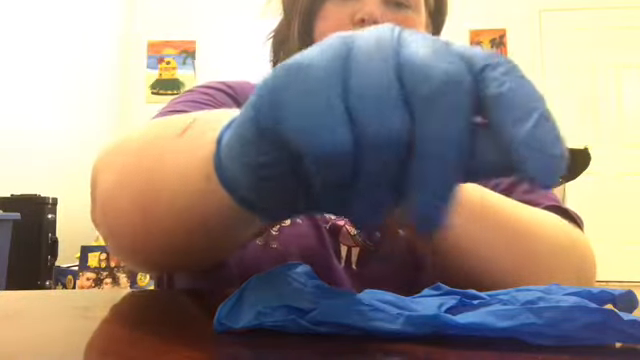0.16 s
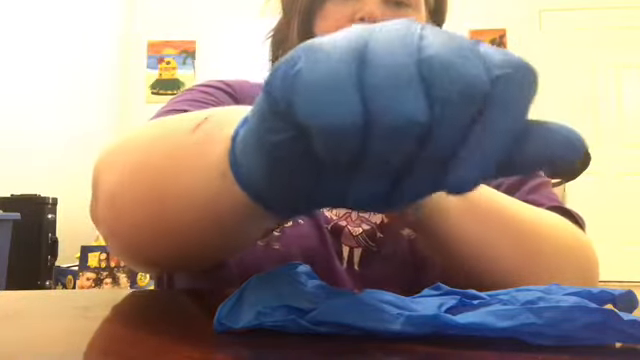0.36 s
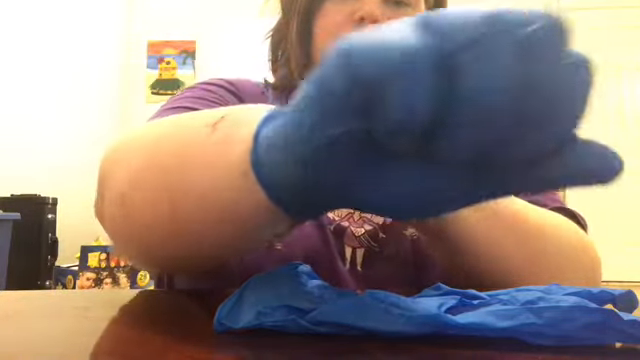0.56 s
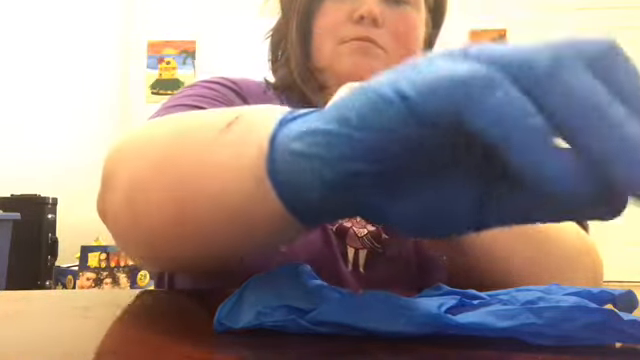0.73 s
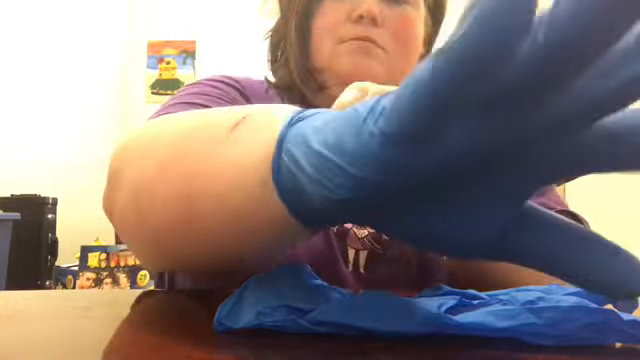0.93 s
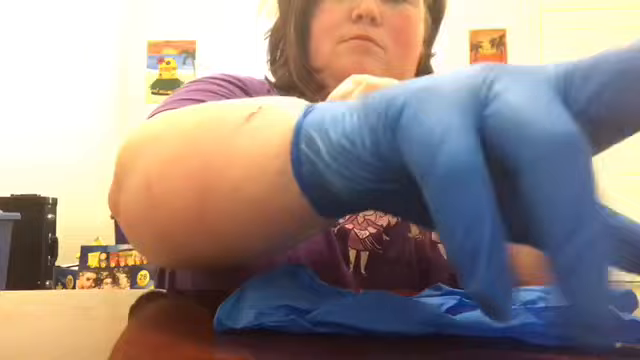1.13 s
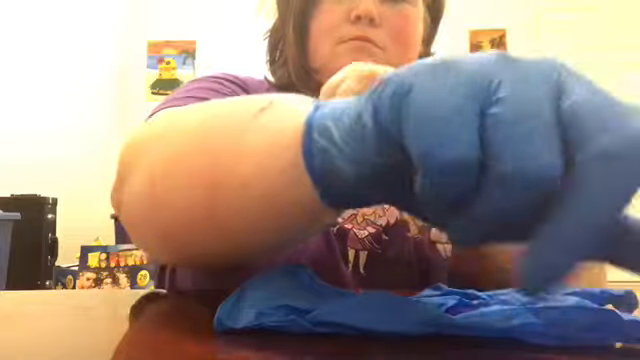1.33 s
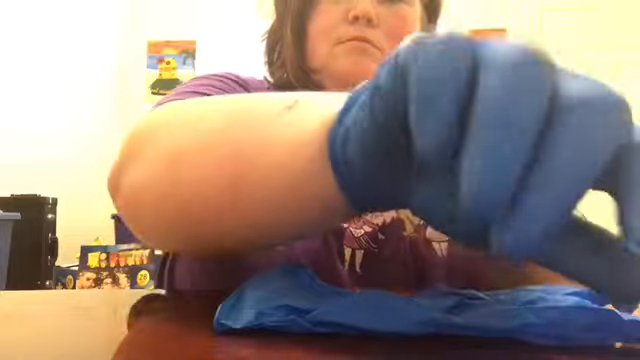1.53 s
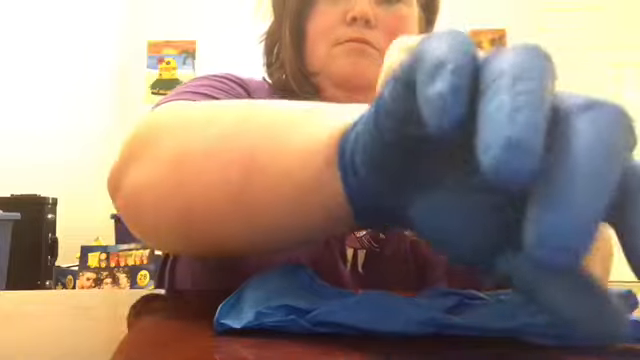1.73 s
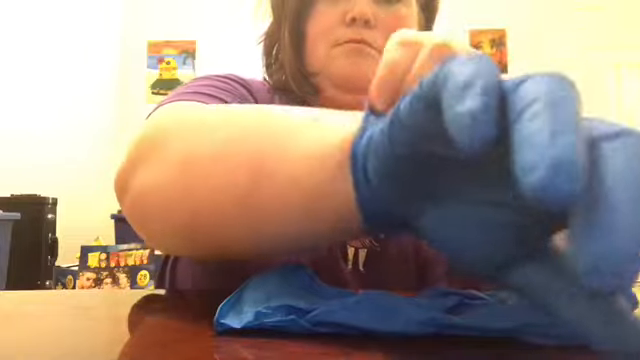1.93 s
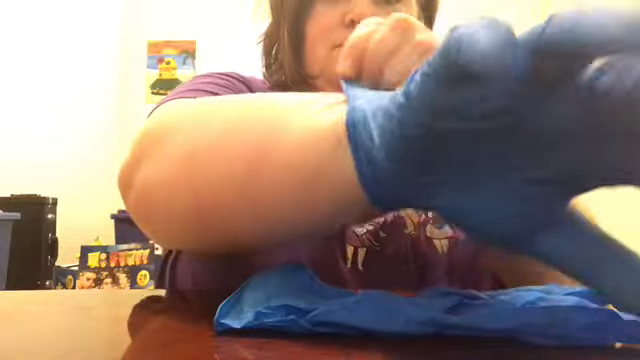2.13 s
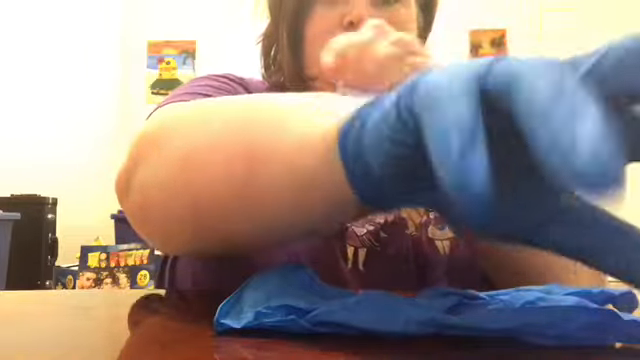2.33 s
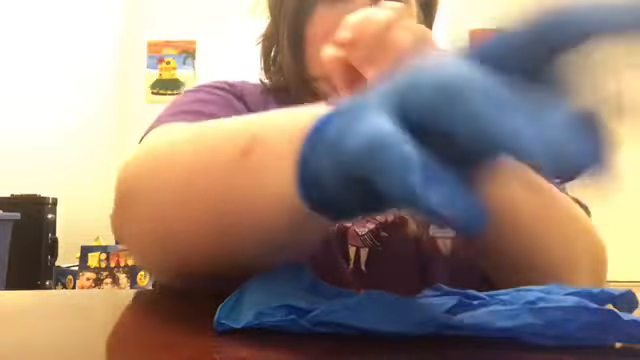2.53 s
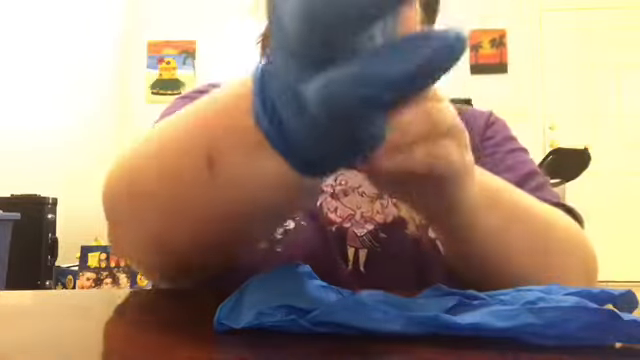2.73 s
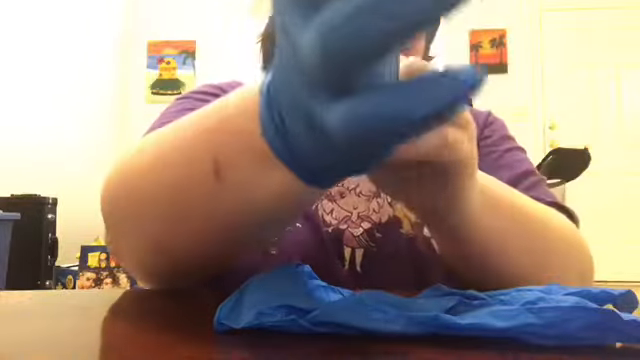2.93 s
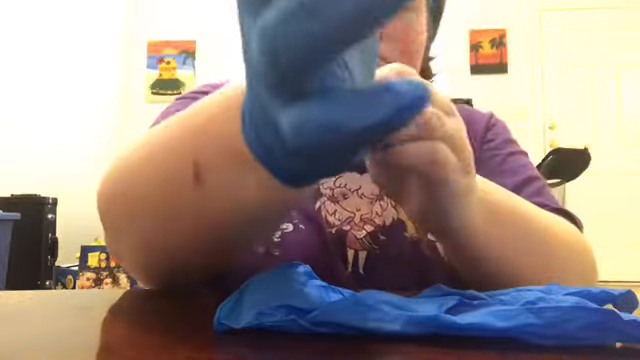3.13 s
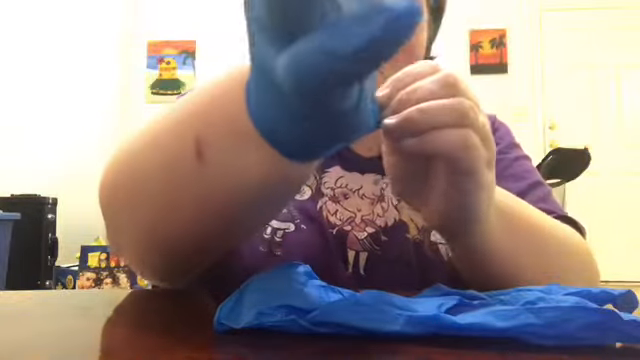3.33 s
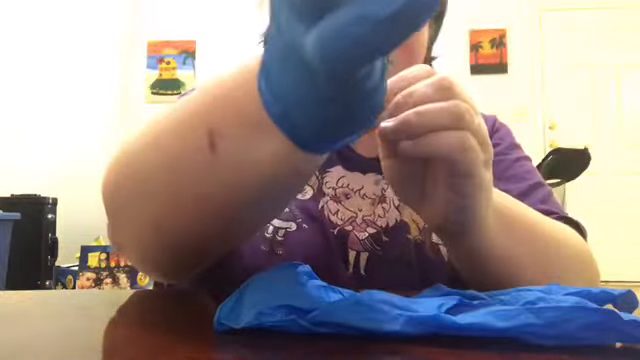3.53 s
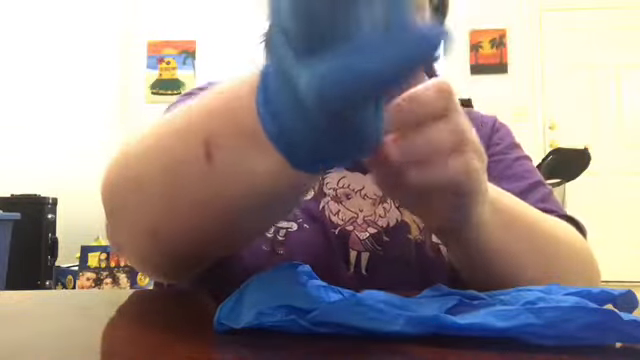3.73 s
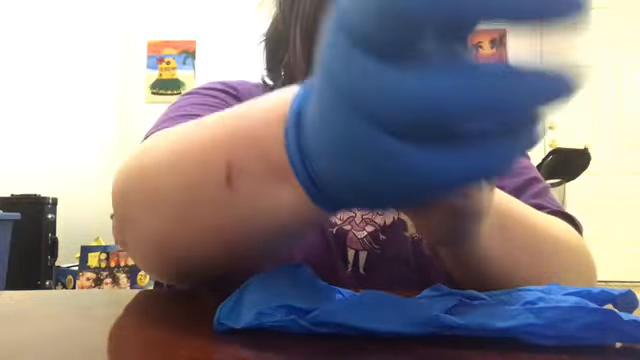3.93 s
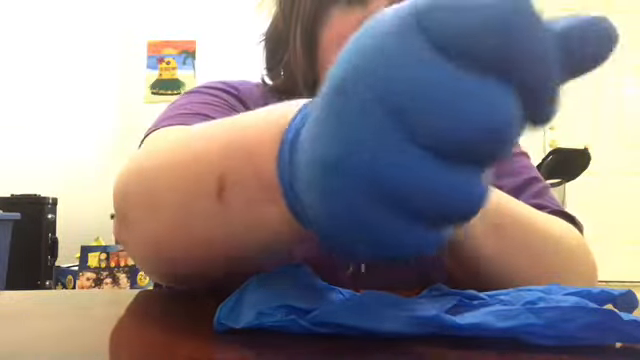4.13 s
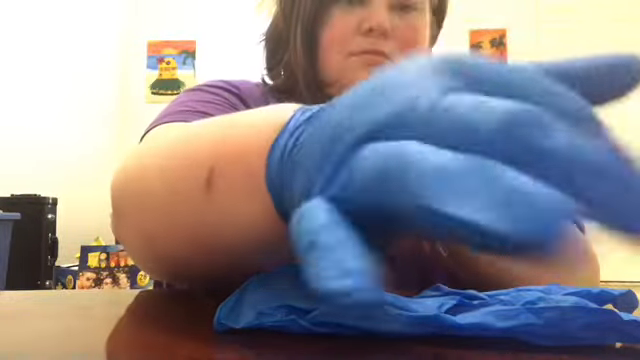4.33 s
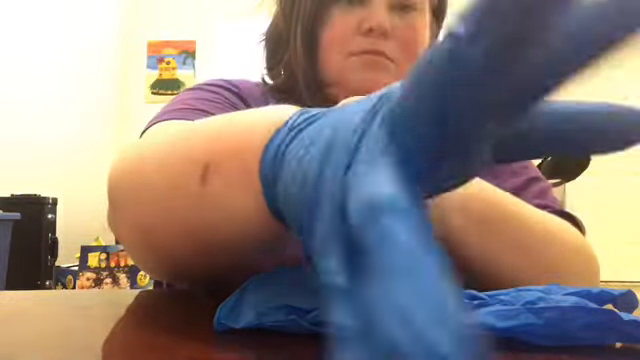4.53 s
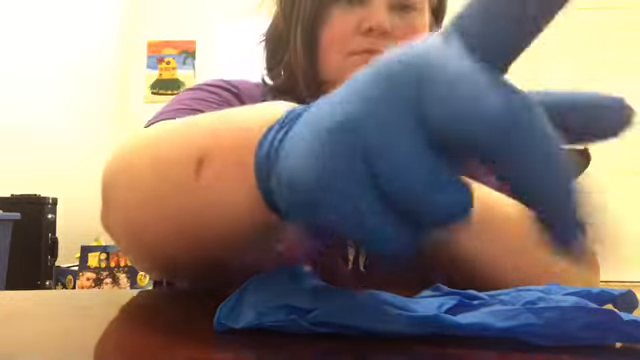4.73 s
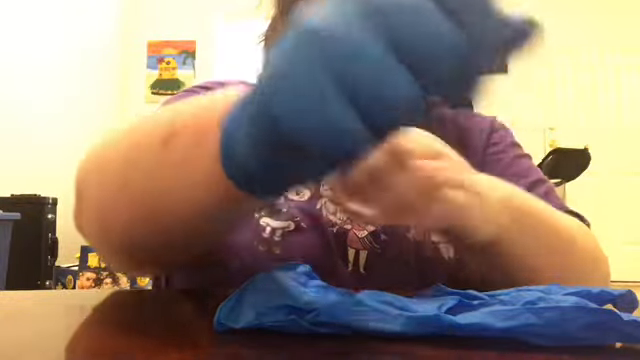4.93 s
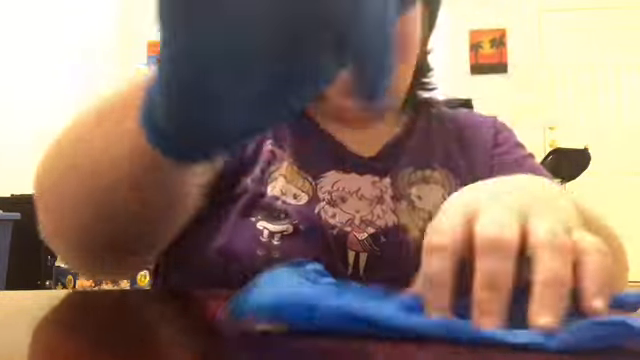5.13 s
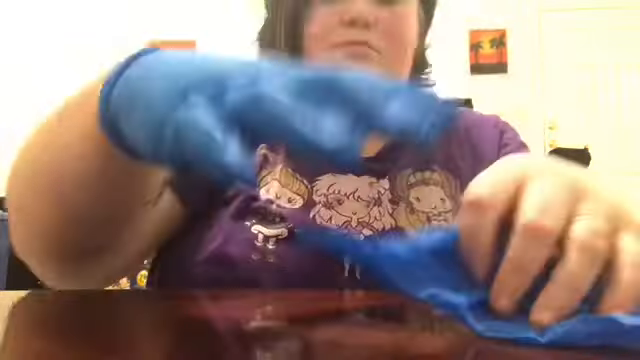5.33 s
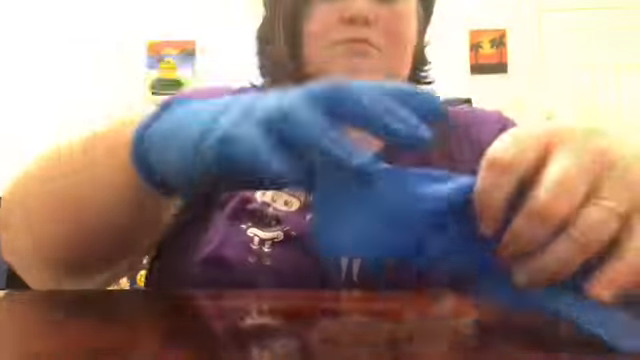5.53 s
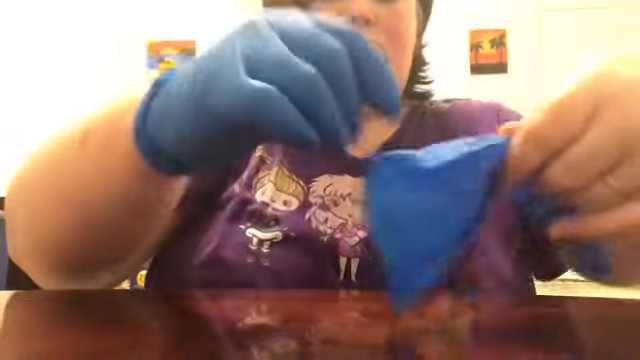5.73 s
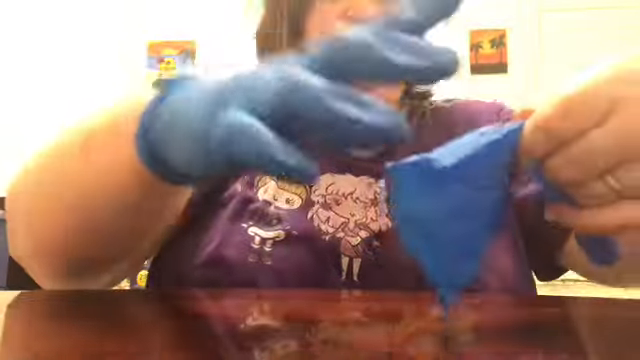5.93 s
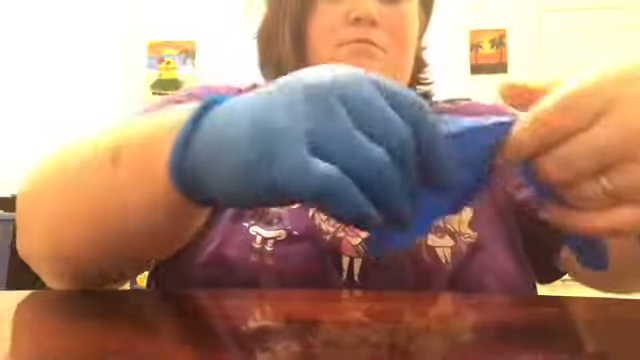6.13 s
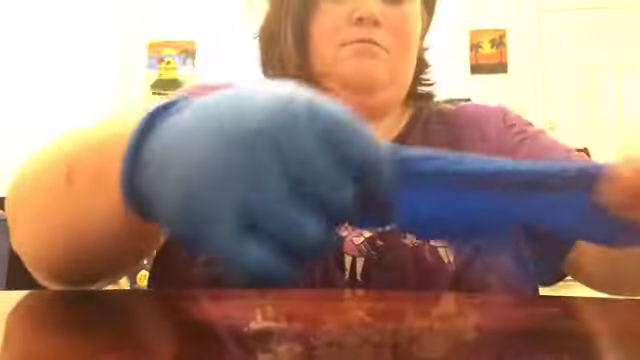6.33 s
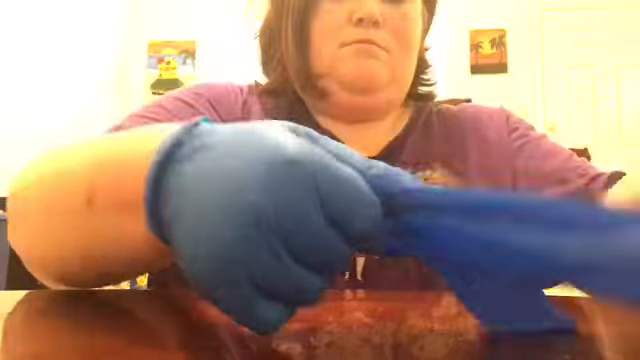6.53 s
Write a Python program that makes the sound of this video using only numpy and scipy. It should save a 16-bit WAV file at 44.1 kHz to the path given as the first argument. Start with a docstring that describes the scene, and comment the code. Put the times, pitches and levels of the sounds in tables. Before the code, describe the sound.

A thin rubber glove is handled very close to the microphone in a small, fairly live room, over a faint low mains hum and soft room air. It opens with a brief creaky rub, then light rubbing, squeaky hiss and scattered little fold pops, stronger around 0.6 and 0.95 seconds, thinning to quiet crackles and ticks by 2.3. At 2.4 the stretched cuff snaps on the wrist as a quick double slap, the second hit much louder. A lighter, ringing snap follows at 3.1, a loud, full one at 3.5, and a medium, crisp one at 4.2, each leaving a short room tail. Rubber scuffs briefly at 3.6, rubs and squeaks at 4.3 to 4.4, and pops at 4.75. From 4.9 to the end near 6.7, glove rubber slides and rustles over skin and table, with a bright scuff at 5.2, crinkles, and a last small pop.

```python
"""A gloved hand rubs and creaks close to the microphone, over a low mains hum and a rush of room air.
Its cuff snaps back on the wrist four times, and rubber slides over skin and table from 3.6 s.
Friction is stick-slip clicks ringing folds of rubber, plus filtered noise; popping folds are short rings.
A snap is one click filtered into thud, slap, crack, ring and sizzle, its film parts scattered in time.
Single early echoes and a dense decaying tail place the gloves in a small, fairly live room."""
import sys
import numpy as np
from scipy import signal
from scipy.fft import rfft, irfft, next_fast_len
from scipy.io import wavfile

SR = 44100
rng = np.random.default_rng(int(sys.argv[2]) if len(sys.argv) > 2 else 0)


def master_out(mix):
    """Clip the mix to full scale and print it as 16-bit PCM to the path in sys.argv[1]."""
    frames = np.transpose(np.atleast_2d(mix))
    ceiling = np.clip(frames, -1, 1)
    pcm = np.round(ceiling * 32767).astype(np.int16)
    wavfile.write(sys.argv[1], SR, pcm)


N = 294588
TIME = np.arange(N) / SR

# Spectral shape of the room air. Each row: frequency in Hz, relative density in dB per Hz.
AIR_SPECTRUM = [(25, -18), (42, -3.5), (70, 0.5), (100, 3.5), (155, -9), (260, -2), (370, -9.5), (520, -16),
                (1000, -22), (1600, -24.5), (2600, -32), (7000, -34.5), (16000, -45.5)]
AIR_DB = -52.5  # rms
# Mains hum and a weaker tone above it. Each row: frequency in Hz, level in dB rms before it wavers.
HUM_TONES = [(120, -57), (259.4, -67)]

# Reverberant energy. Each row: frequency in Hz, level in dB against the sound fed to the room.
ROOM_SPECTRUM = [(150, -16.5), (360, -8), (500, -10), (720, -10), (1200, -18), (2050, -14.5), (3000, -15.5),
                 (5000, -9.5), (8000, -14.5), (10500, -17.5), (16000, -23.5)]
# Reverberation time. Each row: frequency in Hz, time to fall by 60 dB in seconds.
ROOM_DECAY = [(200, 0.31), (1000, 0.84), (2500, 0.96), (5500, 0.85), (8000, 0.73), (15000, 1)]
# Echoes from the table, the arm and the nearest walls.
# Each row: delay in seconds, level in dB, low-pass corner in Hz.
EARLY_ECHOES = [(.0027, -23.5, 3500), (.0043, -19.5, 2650), (0.013, -22, 12000), (.0185, -35, 9000),
                (.035, -27, 6250)]

# Spectral shape of friction on taut rubber. Each row: frequency in Hz, relative density in dB per Hz.
TAUT_SPECTRUM = [(600, 0.5), (1100, 10.5), (1700, 7.5), (2500, 9), (3000, 6.5), (3900, 2.5), (5200, -27),
                 (7000, -19), (12000, -17.5), (16000, -25.5)]
# Spectral shape of the friction of rubber sliding over skin and table.
# Each row: frequency in Hz, relative density in dB per Hz.
SLIDING_SPECTRUM = [(500, -14), (900, 9), (2200, 4.5), (3700, 6), (4900, 2), (6800, 0.5), (10500, -4.5),
                    (14500, -5), (16000, -3.5)]
# Fingers rubbing and stretching the taut, worn glove. Each row: moment of greatest speed in seconds,
# rise in seconds, fall in seconds, creak level in dB, hiss level in dB, hiss pitch in Hz.
WORN_GLOVE_STROKES = [(0.015, 0.032, 0.028, -45, -54.5, 9000), (0.11, 0.073, 0.039, -59.5, -61.5, 10000),
                      (0.25, 0.088, 0.17, -59.5, -56, 11500), (0.47, 0.26, 0.21, -59, -64, 9100),
                      (0.58, 0.14, 0.18, -55.5, -52, 8500), (0.822, 0.15, 0.019, -54.5, -59, 8500),
                      (0.945, 0.066, 0.051, -65, -57.5, 9900), (1.3, 0.26, 0.28, -69, -70.5, 8500),
                      (1.6, 0.066, 0.046, -59, -60, 9050), (1.652, 0.032, 0.05, -64, -60.5, 7650),
                      (2.12, 0.12, 0.3, -76.5, -71.5, 11000), (2.285, 0.028, .035, -68, -60, 7000),
                      (2.417, 0.0028, 0.0092, -57.5, -47.5, 7700)]
# Rubber sliding over skin and table. Each row: moment of greatest speed in seconds,
# rise in seconds, fall in seconds, creak level in dB, hiss level in dB, hiss pitch in Hz.
SLIDING_STROKES = [(3.604, 0.0066, 0.01, -48, -51, 8000), (3.75, 0.11, 0.53, -68.5, -70, 13000),
                   (3.99, 0.014, 0.018, -60.5, -61, 7750), (4.29, 0.18, 0.13, -52, -51.5, 13000),
                   (4.408, 0.0084, 0.0065, -42.5, -49.5, 8040), (4.6, 0.13, 0.091, -66.5, -63.5, 7960),
                   (4.92, 0.14, 0.22, -58, -61.5, 8100), (5.135, 0.082, 0.13, -59, -51.5, 9200),
                   (5.235, 0.2, 0.11, -57, -56.5, 6600), (5.229, 0.011, 0.0071, -51, -43.5, 14000),
                   (5.72, 0.044, 0.025, -53.5, -55, 14300), (5.79, 0.48, 0.13, -64.5, -71, 6240),
                   (5.98, 0.048, 0.0088, -67, -58, 7750), (6.195, 0.015, 0.029, -54, -74, 5000),
                   (6.42, 0.17, 0.25, -55, -56, 5740), (6.6, 0.29, 0.04, -74, -60, 6100)]
# A stroke is this much quieter at the ends of its rise and fall, along a curve of this power.
STROKE_FADE_DB, STROKE_CURVE = 10.5, 1.42
# Ring of the film under the fingers, higher where it is pulled tighter.
# Each row: time in seconds, frequency in Hz.
FILM_RING = [(0.02, 2250), (0.13, 2560), (0.56, 2960), (0.8, 2346), (1.3, 2780), (4.9, 3116), (6.45, 3440)]

# Folds popping and fingertips catching or letting go. Each row: time in seconds, level in dB
# before the gains of the parts, pitch in Hz, treble in dB before its own gain.
FOLD_TICKS = [(0.027, -27, 2100, -22), (0.036, -33.5, 1400, -12), (0.303, -39, 1930, -25),
              (0.3237, -35.5, 1650, -21), (0.351, -37, 2200, -22), (0.509, -32.5, 1960, -20),
              (0.54, -32, 2820, -18), (0.605, -34, 2150, -20), (0.822, -37, 2360, -20),
              (0.945, -35, 3630, -12), (0.959, -23.5, 3000, -15), (1.007, -42, 6100, -5),
              (1.108, -40, 4660, -1), (1.225, -26.5, 2860, -10), (1.246, -49, 2400, 7.5),
              (1.31, -43, 1540, -2), (1.45, -36.5, 3950, -4.5), (1.598, -35, 2310, -4),
              (1.646, -36.5, 1500, 2), (2.255, -25.5, 1520, 1.5), (2.288, -30, 1450, -23),
              (2.317, -34.5, 1400, -2), (3.398, -32.5, 1820, -11), (4.068, -33, 1830, -28),
              (4.126, -28.5, 2070, -35), (4.498, -36.5, 2070, -5), (4.74, -28, 2670, -18),
              (4.7568, -21.5, 950, -12), (4.7567, -27.5, 3700, -24), (5.221, -24, 1780, -11),
              (5.233, -35, 1700, -11), (5.697, -36, 3780, -16), (6.137, -40.5, 1900, -8),
              (6.188, -34, 2000, -6), (6.5015, -37.5, 2920, -20), (6.676, -27, 3400, -30)]
TICK_RING_S = 0.00052  # time for a fold's ring to fall to 1/e

# Cuff hitting the wrist; the first two rows are one double snap. Each row: start in seconds,
# thud in dB, thud in Hz, slap in dB, slap in Hz, crack in dB, crack in Hz, ring in dB, ring in Hz,
# sizzle in dB, flutter in seconds, room feed in dB. Levels are gains on a one-sample click.
CUFF_SNAPS = [(2.4236, 5, 383, 5, 1400, -1.5, 5330, 2, 4400, -0.5, 0.00066, 4),
              (2.4351, 17, 426, 20.5, 1400, 13.5, 6310, 4, 4180, 1.5, 0.00072, 2.5),
              (3.1419, 2, 323, 5, 1500, 5, 5500, 10.5, 3960, -7, 0.00056, 3.5),
              (3.4558, 12.5, 340, 21.5, 1585, 7, 2400, 15.5, 3360, 3, 0.00091, 0),
              (4.2041, 6.5, 454, 10.5, 1480, 6.5, 8000, 8, 4450, 0, 0.00053, 1)]
# Ring of the stretched cuff. Each row: frequency in Hz, level in dB.
CUFF_RESONANCES = [(1230, -6.5), (1520, -6.5), (1900, -7.5), (2550, -5.5), (5650, -7), (7800, 4)]
CUFF_Q, CUFF_DEAD_DB = 15, -2.5  # sharpness of those modes; level of the part that does not ring
# The pinched strip rings at a pitch set by the pull: its sharpness, and its level into the room.
RING_Q, RING_ROOM_DB = 15, -6.5

# Broad dips in the microphone's response. Each row: frequency in Hz, width in Hz, depth from 0 to 1.
MICROPHONE_DIPS = [(4965, 380, 0.44), (10400, 1420, 0.4)]
CUTOFF_HZ = 15800


def from_db(db):
    """Decibels to amplitude ratio."""
    return 10 ** (np.asarray(db) / 20)


def rms_one(x):
    """Scale to unit mean power."""
    return x / np.sqrt(np.mean(x ** 2) + 1e-20)


def at_hz(points, hz):
    """Interpolate a table on a logarithmic frequency axis."""
    known_hz, values = np.transpose(points)
    return np.interp(np.log(np.maximum(hz, 1)), np.log(known_hz), values)


def colour(x, spectrum):
    """Linear filtering: multiply the spectrum by a smooth gain curve."""
    size = next_fast_len(len(x))
    gain = from_db(at_hz(spectrum, np.fft.rfftfreq(size, 1 / SR)))
    return irfft(rfft(x, size) * gain, size)[:len(x)]


def cut(x, hz, kind, order=2):
    """Butterworth filter, maximally flat in its passband."""
    corners = np.clip(hz, 10, .45 * SR)
    return signal.sosfilt(signal.butter(order, corners, kind, fs=SR, output="sos"), x)


def resonate(x, hz, q):
    """Second-order resonance with unit gain at its peak."""
    top = .4 * SR
    return signal.lfilter(*signal.iirpeak(min(hz, top), max(q, hz / top), fs=SR), x)


def drift(rate):
    """Slow random modulation: unit-power noise interpolated between `rate` knots per second."""
    knots = rng.standard_normal(4000)
    return rms_one(np.interp(TIME * rate, np.arange(len(knots)), knots))


def add(track, s, sound):
    """Superposition: lay a sound into a track at s seconds."""
    start = max(round(s * SR), 0)
    track[start:start + len(sound)] += sound[:N - start]


def background():
    """Stationary noise: a low rush of room air and steady tones wavering slightly in level and phase."""
    sound = from_db(AIR_DB) * rms_one(colour(rng.standard_normal(N), AIR_SPECTRUM))
    for hz, db in HUM_TONES:
        level = from_db(db + 0.43 * drift(7.0)) * np.sqrt(2)
        sound += level * np.sin(2 * np.pi * hz * TIME + 0.19 * drift(2.55))
    return sound


def room(x, first_echo_s):
    """Reverberation: dense echoes gather after a short gap, arrive unevenly and decay band by band."""
    t, response = TIME[:SR], np.zeros(SR)
    edges = np.geomspace(110, 18000, 17)
    white = rng.standard_normal((2, SR))  # neighbouring bands use independent noise
    arrival = np.clip(t / first_echo_s - 1 / 2, 0, 1)  # half strength at first_echo_s
    for k, (low, high) in enumerate(zip(edges, edges[1:])):
        hz = np.sqrt(low * high)
        decay = np.exp(-np.log(1000) * t / at_hz(ROOM_DECAY, hz))
        tail = cut(white[k % 2], [low, high], "band") * arrival * decay
        tail = rms_one(tail * from_db(1.8 * drift(120)[:SR]))
        # energy in proportion to bandwidth, so that the table sets the level
        response += tail * np.sqrt(2 * (high - low)) / SR * from_db(at_hz(ROOM_SPECTRUM, hz))
    return signal.fftconvolve(x, response)[:N]


def early_echoes(x):
    """Specular reflection: nearby surfaces each send back one duller copy."""
    out = np.zeros(N)
    for delay, db, dull_hz in EARLY_ECHOES:
        add(out, delay, from_db(db) * cut(x, dull_hz, "low", order=1))
    return out


def movement(strokes):
    """Strokes swell, fade and add by power; returns creak gain, hiss gain and power-weighted hiss pitch."""
    t = TIME[::20]
    creak_power, hiss_power, weighted_hz = 0, 0, 0
    for s, rise, fall, creak_db, hiss_db, hz in strokes:
        away = np.maximum((s - t) / rise, (t - s) / fall)
        speed = from_db(-STROKE_FADE_DB * abs(away) ** STROKE_CURVE) + 1e-9
        power = (speed * from_db(hiss_db)) ** 2
        creak_power = creak_power + (speed * from_db(creak_db)) ** 2
        hiss_power = hiss_power + power
        weighted_hz = weighted_hz + power * hz
    controls = np.sqrt(creak_power), np.sqrt(hiss_power), weighted_hz / hiss_power
    return [np.interp(TIME, t, control) for control in controls]


def slips(per_s, spread_db):
    """Stick-slip: bunches of tiny clicks of uneven size and random sign."""
    born = rng.random(N) < per_s * from_db(3.5 * drift(60)) / SR
    sizes = from_db(spread_db * np.minimum(rng.exponential(1, N), 3.5))
    return rms_one(born * sizes * rng.choice([-1, 1], N))


def folds(clicks, low_hz, high_hz, q, count):
    """Impulse excitation: each slip rings one of several folds, each with its own pitch."""
    dealt = rng.integers(0, count, N)
    pitches = np.geomspace(low_hz, high_hz, count)
    # the tiny offset keeps the filters clear of vanishingly small numbers
    return rms_one(sum(resonate(clicks * (dealt == k) + 1e-18, hz, q) for k, hz in enumerate(pitches)))


def sing(x, hz, width_hz):
    """Moving resonance: shift the gliding pitch to zero, low-pass, shift back; unit power."""
    turn = np.exp(2j * np.pi * np.cumsum(hz) / SR)
    r = np.exp(-np.pi * width_hz / SR)
    return rms_one((turn * signal.lfilter([1 - r], [1, -r], x / turn)).real)


def tuned_hiss(noise, centre, peak_db, width_octaves):
    """Broadband friction noise in the treble, lifted around the pitch of the stretched film."""
    edges = np.geomspace(4800, 17000, 9)
    out, power = 0, 0
    for k, (low, high) in enumerate(zip(edges, edges[1:])):
        band = cut(noise[k % 2], [low, high], "band")
        octaves_off = np.log2(np.sqrt(low * high) / centre)
        gain = from_db(peak_db * np.exp(-(octaves_off / width_octaves) ** 2))
        flicker = from_db(1.7 * drift(22))  # the contact patch keeps changing
        out = out + gain * flicker * band
        power = power + gain ** 2 * np.mean(band ** 2)
    return out / np.sqrt(power)


def rub(strokes, spectrum, slip_share, slips_per_s, slip_spread_db, crackle_db, crackle_follows, sing_db):
    """Dry friction: rubber catches and slips (creak), its film rings, its texture slides and crackles (hiss)."""
    creak_gain, hiss_gain, hiss_hz = movement(strokes)
    grip = from_db(1.7 * drift(110))
    texture = [colour(white * grip, spectrum) for white in rng.standard_normal((2, N))]

    catches = slips(slips_per_s, slip_spread_db)
    catching = folds(catches, low_hz=1400, high_hz=4420, q=4.9, count=12)
    slipping = rms_one(colour(catching, spectrum))
    smooth = rms_one(cut(texture[1], 5500, "low", order=4))
    creak = np.sqrt(slip_share) * slipping + np.sqrt(1 - slip_share) * smooth
    film_hz = np.interp(TIME, *np.transpose(FILM_RING))
    creak = rms_one(creak + from_db(sing_db) * sing(creak, film_hz, width_hz=330))

    hiss = tuned_hiss(texture, hiss_hz, peak_db=3.0, width_octaves=0.22)
    # crackle gain grows more slowly than hiss gain: crackles stand out in slow movement, merge in fast
    crackle = folds(slips(per_s=380, spread_db=5.0), low_hz=4530, high_hz=13000, q=4.5, count=8)
    crackle_gain = from_db(crackle_db) * hiss_gain ** crackle_follows
    return creak_gain * creak + hiss_gain * hiss + crackle_gain * crackle


def swell(t, decay):
    """Critically damped envelope: peaks at 1 after one decay time, then dies."""
    return t / decay * np.exp(1 - t / decay)


def damped(t, hz):
    """Heavily damped oscillation: rubber on flesh swings only a cycle or two."""
    return np.sin(2 * np.pi * hz * t) * np.exp(-t / TICK_RING_S)


def flutter(t, decay):
    """Phase scattering: film slaps down patch by patch, one click's flat spectrum spread in time."""
    scatter = np.angle(rfft(rng.standard_normal(len(t)) * swell(t, decay)))
    return irfft(np.exp(1j * scatter), len(t)) * np.exp(-(t / (10 * decay)) ** 2)


def fold_ticks():
    """Sudden release of a small fold: a very short ring, a dry crinkle near its pitch, a spit of treble."""
    out, t = np.zeros(N), TIME[:SR // 40]
    for s, level_db, hz, treble_db in FOLD_TICKS:
        ring = cut(damped(t, hz), 370, "high")
        crinkle = cut(flutter(t, decay=0.00062), [hz / 2.1, hz * 1.36], "band")
        spit = cut(flutter(t, decay=0.00041), [4600, 13000], "band")
        tick = from_db(-2.0) * ring + from_db(12.5) * crinkle + from_db(treble_db + 13.0) * spit
        add(out, s + 0.00058, from_db(level_db) * tick)
    return out


def crack(push, hz):
    """Broad resonance: the taut film answers over about an octave."""
    return cut(cut(push, [hz / 1.86, hz * 1.15], "band"), 9100, "low", order=6)


def cuff(push):
    """Modal response: heard from close by, the stretched cuff rings briefly in a few broad modes."""
    ringing = sum(from_db(db) * resonate(push, hz, CUFF_Q) for hz, db in CUFF_RESONANCES)
    return from_db(CUFF_DEAD_DB) * push + ringing


def snaps():
    """Impact: thud of the arm, slap of trapped air, crack, ring and sizzle of film; direct and room feed."""
    direct, feed, t = np.zeros(N), np.zeros(N), TIME[:SR // 16]
    click = 1. * (t == 0)
    for (s, thud_db, thud_hz, slap_db, slap_hz, crack_db, crack_hz,
         ring_db, ring_hz, sizzle_db, decay, room_db) in CUFF_SNAPS:
        thud = from_db(thud_db) * cut(click, [thud_hz / 1.5, thud_hz * 1.52], "band")
        slap = from_db(slap_db) * cut(click, [slap_hz / 2.0, slap_hz * 1.314], "band")
        film = from_db(crack_db) * crack(click, crack_hz)
        sizzle = from_db(sizzle_db) * cut(click, [3000, 14500], "band")
        ring = from_db(ring_db) * resonate(click, ring_hz, RING_Q)
        add(direct, s, thud)
        add(direct, s + 0.00027, cuff(slap))
        for part in (cuff(film) + ring, sizzle):
            add(direct, s, signal.fftconvolve(part, flutter(t, decay)))
        # the walls gather sound from all sides of the wrist, so the parts add by power
        parts = (thud, slap, film, sizzle, from_db(RING_ROOM_DB) * ring)
        radiated = np.sqrt(sum(abs(rfft(part)) ** 2 for part in parts))
        # a zero-phase pulse, centred on the snap
        add(feed, s - t[-1] / 2, from_db(room_db) * np.fft.fftshift(irfft(radiated)))
    return direct, feed


def scene():
    """Superposition of direct sound, early echoes, reverberation and background."""
    worn = rub(WORN_GLOVE_STROKES, TAUT_SPECTRUM, slip_share=0.62, slips_per_s=620, slip_spread_db=3.5,
               crackle_db=-36, crackle_follows=0.51, sing_db=-7.0)
    sliding = rub(SLIDING_STROKES, SLIDING_SPECTRUM, slip_share=0.5, slips_per_s=700, slip_spread_db=3.0,
                  crackle_db=-19.5, crackle_follows=0.85, sing_db=-22)
    handling = worn + sliding + fold_ticks()
    snap, snap_feed = snaps()
    near = snap + handling
    echoes = room(snap_feed + from_db(-3.5) * handling, first_echo_s=0.0093)
    return (near + early_echoes(near) + echoes + background())[None]


def record(dry):
    """Transducer response: deep bass drops, treble dips, peaks round off by saturation, the top is cut."""
    sound = cut(dry, 28, "high")
    for hz, width_hz, depth in MICROPHONE_DIPS:
        sound = sound - depth * resonate(sound, hz, hz / width_hz)
    rounded = 1.1 * np.tanh(sound / 1.1)
    low_pass = signal.ellip(10, .1, 85, CUTOFF_HZ, fs=SR, output="sos")
    return signal.sosfilt(low_pass, rounded)


dry = scene()
out = record(dry)
master_out(out)
```